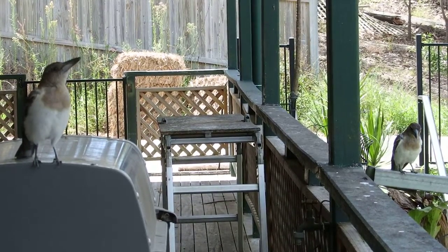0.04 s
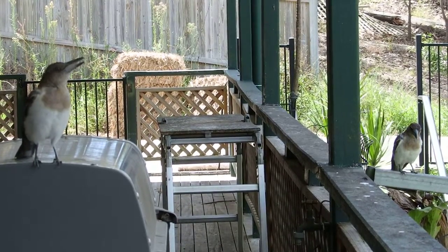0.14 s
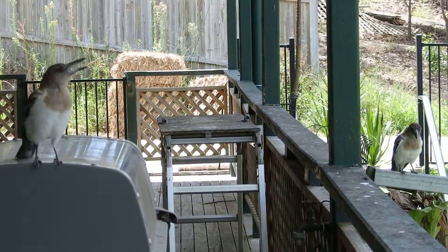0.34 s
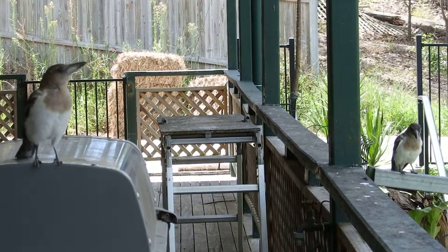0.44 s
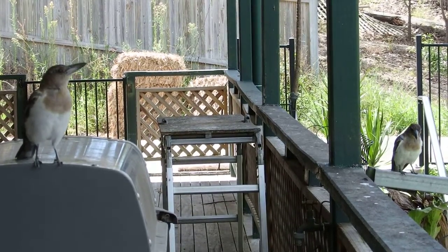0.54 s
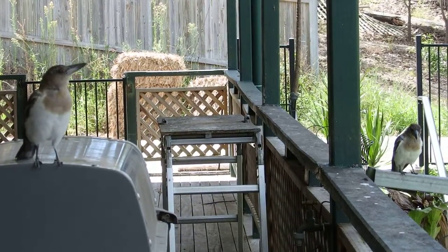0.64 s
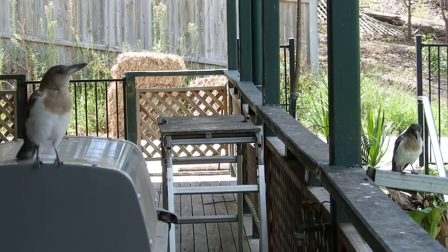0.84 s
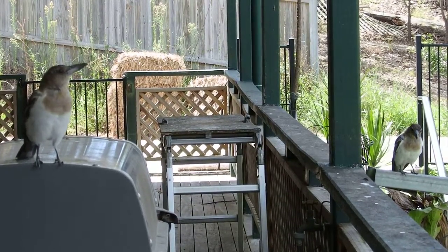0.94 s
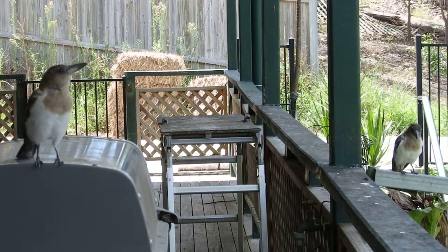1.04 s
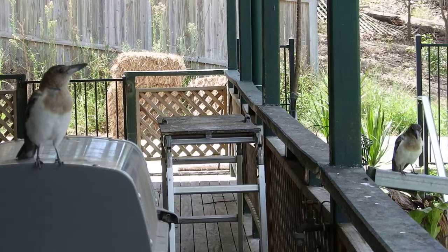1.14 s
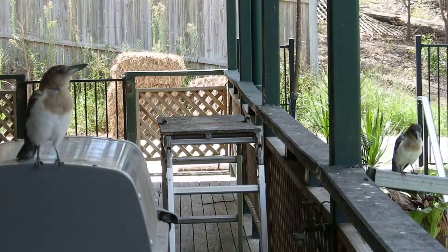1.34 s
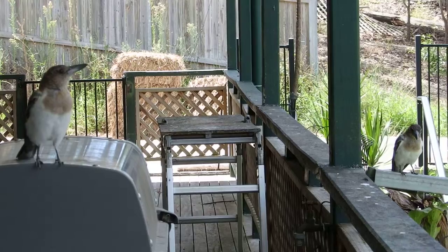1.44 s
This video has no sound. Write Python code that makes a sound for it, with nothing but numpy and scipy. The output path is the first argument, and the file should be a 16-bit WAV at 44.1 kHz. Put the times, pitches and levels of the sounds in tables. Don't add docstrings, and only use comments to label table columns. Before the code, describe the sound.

Harsh call of a young bird breaks into a short piercing whistle, over soft insect hiss

```python
import sys
import numpy as np
from scipy import signal
from scipy.fft import rfft, irfft
from scipy.io import wavfile
from scipy.ndimage import uniform_filter1d

SR = 44100
rng = np.random.default_rng(int(sys.argv[2]) if len(sys.argv) > 2 else 0)


def elevation(decibels):
    levels = np.asarray(decibels, float)
    return 10 ** (levels / 20)


def generate_wav(sig):
    pcm = np.round(np.clip(np.atleast_2d(sig).T, -1, 1) * 32767).astype(np.int16)
    wavfile.write(sys.argv[1], SR, pcm)


N = 66150
TIME = np.arange(N) / SR
CUTOFF_HZ = 14400


def rms_one(x):
    return x / np.sqrt(np.mean(np.abs(x) ** 2) + 1e-20)


def in_time(rows):
    s, *columns = np.transpose(rows)
    return [np.interp(TIME, s, column) for column in columns]


def at_hz(points, hz):
    points = np.array(points)
    return np.interp(np.log(hz), np.log(points[:, 0]), points[:, 1])


def drift(rate_hz):
    r = np.exp(-2 * np.pi * rate_hz / SR)
    noise = rng.standard_normal(N + SR)
    return rms_one(signal.lfilter([1], [1, -2 * r, r * r], noise)[SR:])


def wander(rate_hz):
    return drift(rate_hz) + 1j * drift(rate_hz)


def running_phase(hz):
    return 2 * np.pi * np.cumsum(hz) / SR


def coloured(spectrum, patchy_db):
    # (f/Hz, level/dB)
    width = [(60, -22), (180, -20.5), (530, -21.5), (1560, -14), (4640, -10), (13800, -5)]
    # (f/Hz, level/dB)
    lean = [(60, -6), (230, 4.5), (910, 0.5), (3540, 1), (13800, -2)]
    hz = np.maximum(np.fft.rfftfreq(N, 1 / SR), 1)
    shape = elevation(at_hz(spectrum, hz)) * (hz > spectrum[0][0])
    mid, side = rfft(rng.standard_normal((2, N))) * shape
    side = side * elevation(at_hz(width, hz))
    tilt = elevation(at_hz(lean, hz) / 2)
    pair = np.array([(mid + side) * tilt, (mid - side) / tilt])
    out = 0
    for centre in 30 * 2. ** np.arange(10):
        octave = np.cos(np.pi / 2 * np.clip(np.log2(hz / centre), -1, 1)) ** 2
        out = out + irfft(pair * octave, N) * elevation(patchy_db * drift(11.4))
    return rms_one(out)


def chorus(hz, width_hz, level_db):
    f = np.fft.rfftfreq(N, 1 / SR)
    resonance = 1 + ((f - hz) / (width_hz / 2)) ** 2
    mid, side = irfft(rfft(rng.standard_normal((2, N))) / resonance, N)
    pair = np.array([mid + 0.093 * side, mid - 0.12 * side])
    return elevation(level_db + 1.63 * drift(27.0)) * rms_one(pair)


def garden():
    # (t/s, level/dB)
    wind = [(0, 0.3), (.5, -1.5), (.95, 0.5), (1.2, 3), (1.5, 0.5)]
    # (f/Hz, level/dB)
    rumble = [(18, -61), (30, -62), (140, -6.5), (314, -5.5), (360, -1.5), (449, -7.5), (644, -1.5),
              (923, -6), (1800, -37.5), (2340, -43), (3960, -120)]
    # (f/Hz, level/dB)
    hiss = [(880, -5), (1500, -14.5), (4070, -16.5), (4820, -9.5), (5980, -19.5), (6570, -15),
            (7780, -23.5), (11900, -35), (14200, -21.5)]
    # (f/Hz, width/Hz, level/dB)
    insects = [
        (6610, 710, -38.5),
        (5020, 1050, -45.5),
    ]
    # (f/Hz, width/Hz, level/dB)
    motor = [(81.9, 8.8, -54.5)]
    gust, = in_time(wind)
    out = elevation(-32.5 + gust) * coloured(rumble, patchy_db=2.15)
    out = out + elevation(-39.5) * coloured(hiss, patchy_db=1.26)
    for row in [*insects, *motor]:
        out = out + chorus(*row)
    return out


def carols():
    # (start t/s, length/s, f/Hz, end f/Hz, level/dB)
    notes_sung = [(-.03, 0.091, 2860, 2820, -46.5), (0.087, 0.099, 2766, 2733, -53.5),
                  (.0, 0.052, 1330, 1170, -46.5), (0.065, 0.058, 930, 858, -37.5),
                  (0.196, 0.057, 2215, 2410, -37), (0.216, .045, 2754, 2690, -38),
                  (0.286, 0.14, 5540, 5610, -38.5), (0.398, 0.12, 844, 827, -42),
                  (0.489, 0.052, 955, 925, -46), (0.678, 0.091, 1203, 1028, -45.5),
                  (0.731, 0.053, 600, 581, -41.5), (0.759, 0.07, 1075, 1125, -38),
                  (0.807, 0.087, 1026, 978, -37), (0.847, 0.078, 930, 893, -41.5),
                  (1.046, 0.1, 1138, 1112, -26.5), (1.061, 0.029, 630, 620, -32.5),
                  (1.132, 0.072, 1341, 1331, -38.5), (1.152, 0.029, 1132, 1132, -29),
                  (1.183, 0.063, 891, 920, -39)]
    out = 0
    for start, length, hz, end_hz, level_db in notes_sung:
        u = np.clip((TIME - start) / length, 0, 1)
        swell = np.sin(np.pi * u ** 0.73) ** 1.2
        blur_depth = .2 if level_db > -33 else .55
        blur = 1 + blur_depth * wander(35.)
        tone = np.exp(1j * running_phase(hz + (end_hz - hz) * u))
        out = out + elevation(level_db + 4) * swell * np.real(blur * tone)
    return out


def verandah(x):
    t60_s = 0.24
    t = np.arange(SR // 2) / SR
    decay = elevation(-60 * t / t60_s) * (t > .003)
    mid, side = rng.standard_normal((2, len(t))) * decay
    tail = np.array([mid + 0.16 * side, mid - .2 * side])
    return signal.fftconvolve(x[None], tail / np.sqrt(np.sum(mid ** 2)), axes=1)[:, :N]


def puff():
    at_s, length_s = .368, .025
    return elevation(-57) * np.sin(2 * np.pi * np.clip((TIME - at_s) / length_s, -.5, .5))


def breath():
    # (t/s, level/dB)
    airflow = [(.13, -60), (.2, -48), (.26, -40), (.3, -32), (.325, -25), (.345, -18), (.368, -20),
               (.385, -33), (.41, -56)]
    # (f/Hz, level/dB)
    colour = [(900, -13), (1500, -14), (2200, -3), (3800, 0), (4700, -8), (7500, -11), (10000, -15),
              (14300, -26)]
    f = np.maximum(np.fft.rfftfreq(N, 1 / SR), 1)
    shape = elevation(at_hz(colour, f)) * np.minimum(f / 900, 1) ** 2
    air = rms_one(irfft(rfft(rng.standard_normal(N)) * shape, N))
    on = (TIME > airflow[0][0]) * (TIME < airflow[-1][0])
    return on * elevation(in_time(airflow)[0] + 1.4 * drift(120.0)) * air


def squawk():
    # (t/s, effort/dB, beak opening 0-1)
    push = [
        (.125, -56, 0.01),
        (.155, -42, 0),
        (.2, -32.5, 0.27),
        (.25, -26, 0.88),
        (.3, -21.5, 0.92),
        (.328, -20, 0.93),
        (.342, -22.5, 1),
        (.358, -15.5, 0.76),
        (.378, -12, 0.52),
    ]
    # (t/s, f/Hz)
    pitch = [(.125, 885), (.155, 930), (.2, 1000), (.25, 1028), (.305, 1055), (.325, 1130), (.342, 1850),
             (.358, 2350), (.378, 2830)]
    # (f/Hz, level/dB)
    shut = [(900, 11), (1900, 7.5), (2900, -14), (4000, -68), (8300, -73), (9900, -11.5), (11100, -24),
            (12200, -23)]
    # (f/Hz, level/dB)
    wide_open = [(1000, -7), (2100, -6), (3200, 3.9), (4200, 4), (5200, 5), (6300, -7.5), (7500, -1),
                 (14000, -33)]
    hoarse, hoarse_hz, jitter = .58, 62, .007
    crack_s, crack_loss_db, crack_hoarse_hz = .33, -22, 300
    hz, = in_time(pitch)
    effort_db, beak = in_time(push)
    beak = np.clip(beak, 0, 1)
    phase = running_phase(hz * (1 + jitter * drift(83.0)))
    cracked = np.clip((TIME - crack_s) / .008 + 1, 0, 1)
    out = 0
    for k in range(1, 15):
        waver = (1 - hoarse) + hoarse * wander(hoarse_hz * k ** .8)
        if k > 2:
            waver = waver * elevation(crack_loss_db * cracked)
        else:
            waver = waver * (1 - cracked) + .8 * cracked * wander(crack_hoarse_hz)
        colour_db = (1 - beak) * at_hz(shut, k * hz) + beak * at_hz(wide_open, k * hz)
        overtone = np.real(waver * np.exp(1j * k * phase))
        out = out + elevation(colour_db) * (k * hz < CUTOFF_HZ) * overtone
    fade_in = np.clip((TIME - push[0][0]) / 0.0051, 0, 1)
    fade_out = np.clip((push[-1][0] + 0.0067 - TIME) / .01, 0, 1)
    return fade_in * fade_out * elevation(effort_db) * out


def whistle():
    # (peak t/s, level/dB, length/s, f/Hz)
    throbs = [(.368, -7, .02, 2800), (.3815, -4, .014, 2830), (.39, -15, .008, 2900),
              (.397, -7, .012, 2850), (.4075, -11, .016, 2830), (.421, -13, .016, 2800),
              (.432, -13, .012, 2860), (.441, -18, .011, 2860), (.451, -16, .013, 2870),
              (.462, -28, .009, 2850), (.472, -23, .017, 2850), (.493, -27, .017, 2880),
              (.502, -32, .008, 2880), (.518, -30, .02, 2870)]
    overtones_db = [-22, -30, -34]
    rows = np.array(throbs)
    phase = running_phase(np.interp(TIME, rows[:, 0], rows[:, 3]))
    beat = 0
    for k, (peak_s, level_db, length, _) in enumerate(throbs):
        hump = np.cos(np.pi * np.clip((TIME - peak_s) / length, -.5, .5))
        beat = beat + (-1) ** k * elevation(level_db) * hump

    from_s, to_s = .372, .478
    fade = np.clip(np.minimum(TIME - from_s, to_s + 0.013 - TIME) / .03, 0, 1)
    body = uniform_filter1d(np.abs(beat), size=300) * fade
    high = 0
    for k, level_db in enumerate(overtones_db, start=2):
        waver = .5 + drift(44.0) + 1j * drift(70.0)
        high = high + elevation(level_db) * np.real(waver * np.exp(1j * k * phase))

    ring_db, ring_t60_s, ring_hz = -34, .6, 2860
    since = np.maximum(TIME - throbs[9][0], 0)
    ring = elevation(ring_db - 60 * since / ring_t60_s) * np.minimum(since / 0.082, 1)
    ring = ring * (1 + .5 * wander(45.0))
    return beat * np.sin(phase) + body * high + np.real(ring * np.exp(2j * np.pi * ring_hz * TIME))


def scene():
    # (t/s, level/dB)
    ducking = [
        (0, -8.5),
        (.3, -3.5),
        (.36, -4.5),
        (.42, -11),
        (.55, -9.5),
        (.8, -7),
        (1.1, -3),
        (1.5, 1.2),
    ]
    gain, = in_time(ducking)
    far = carols()
    call = squawk() + breath()
    pure = whistle()
    wet = verandah(elevation(-6) * call + elevation(-18) * pure + elevation(-7) * far)
    direct = (call + pure + far) * elevation([[.15], [-.15]])
    return direct + wet + elevation(gain) * garden() + puff()


def low_pass(x):
    return signal.sosfilt(signal.butter(12, 14360, fs=SR, output="sos"), x)


def record(dry):
    top_cut = signal.cheby2(12, 70, CUTOFF_HZ + 150, fs=SR, output="sos")
    mix = signal.sosfilt(top_cut, dry)
    return low_pass(mix)


dry = scene()
out = record(dry)
generate_wav(out)
```